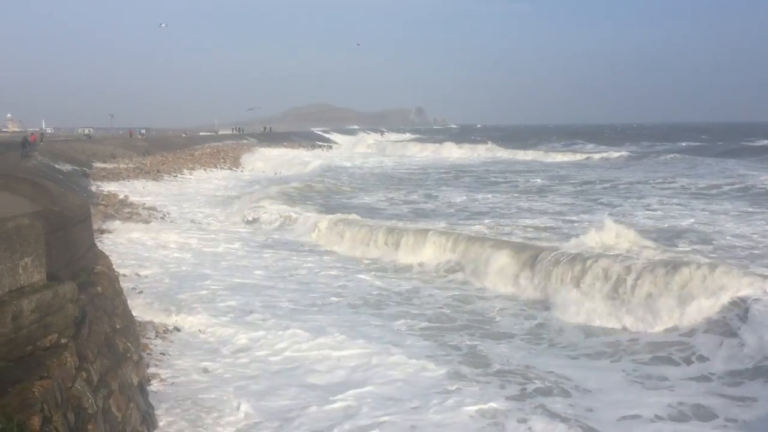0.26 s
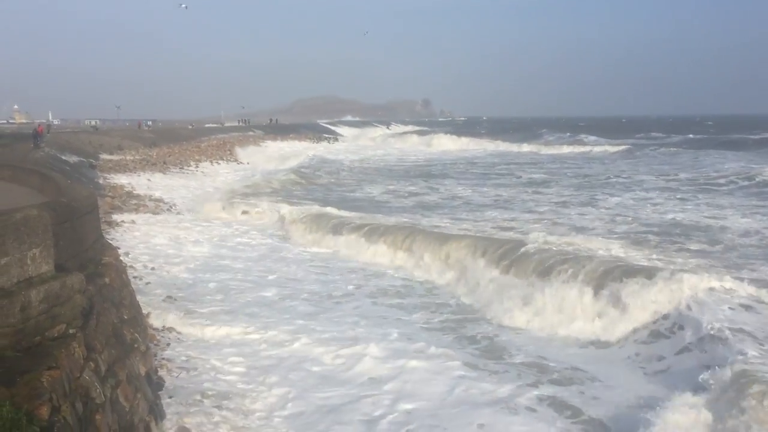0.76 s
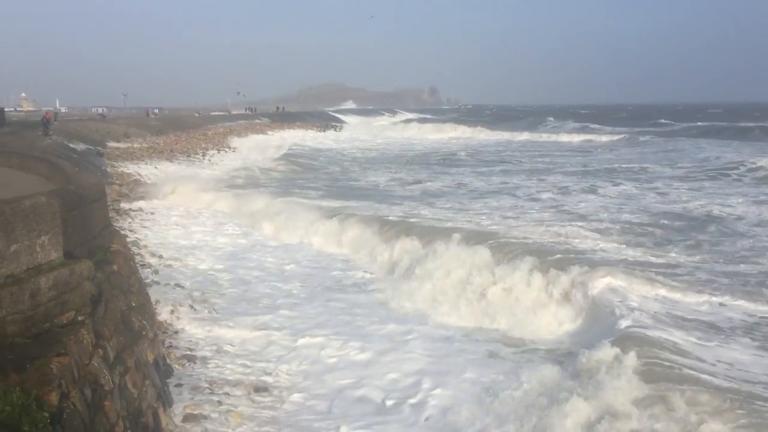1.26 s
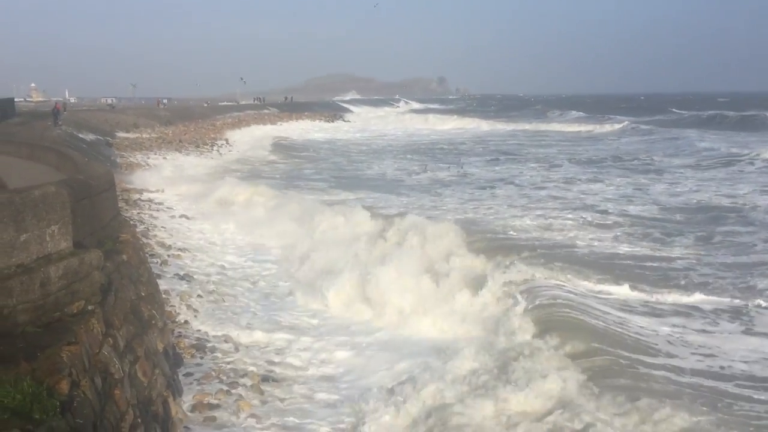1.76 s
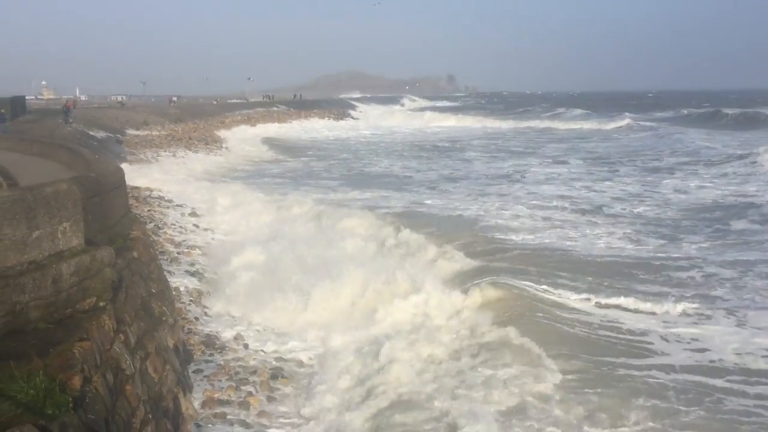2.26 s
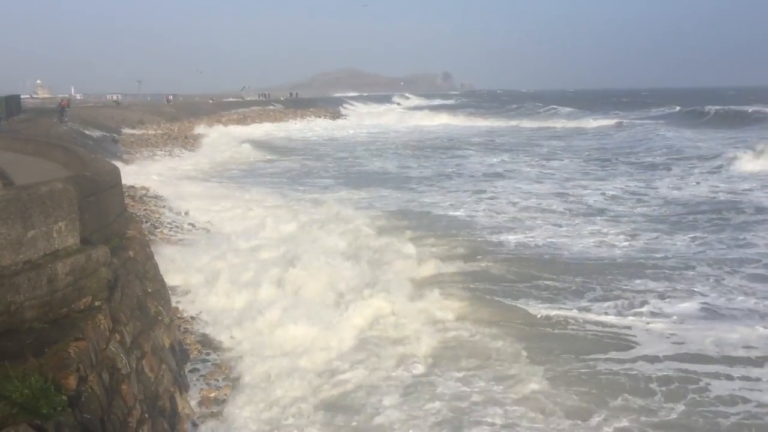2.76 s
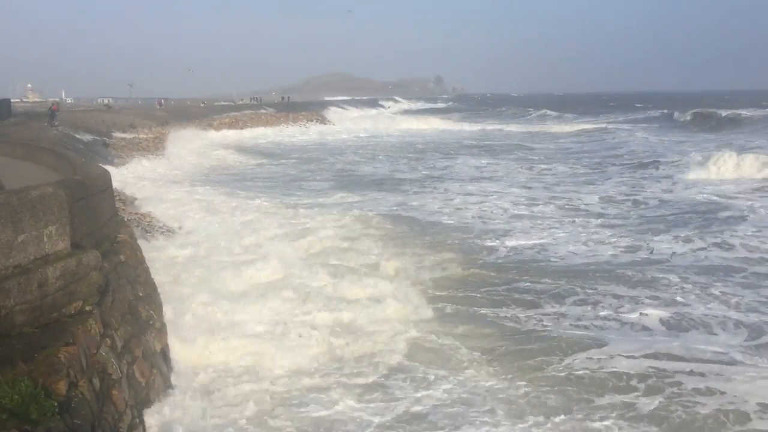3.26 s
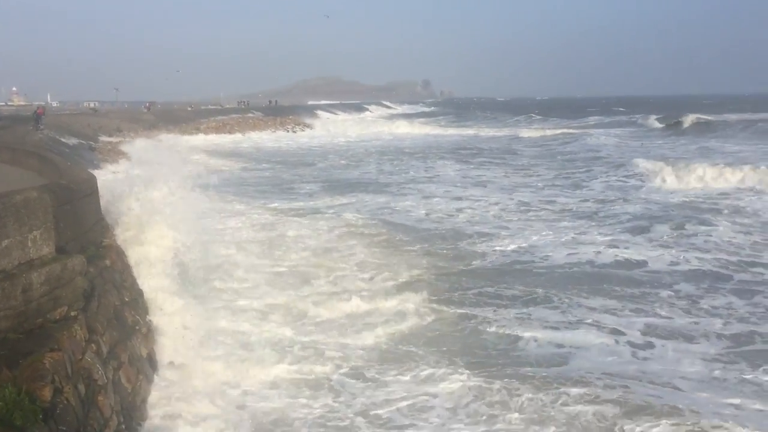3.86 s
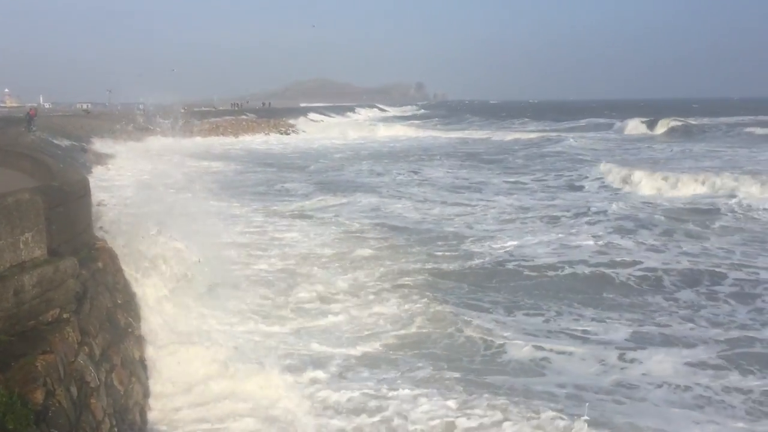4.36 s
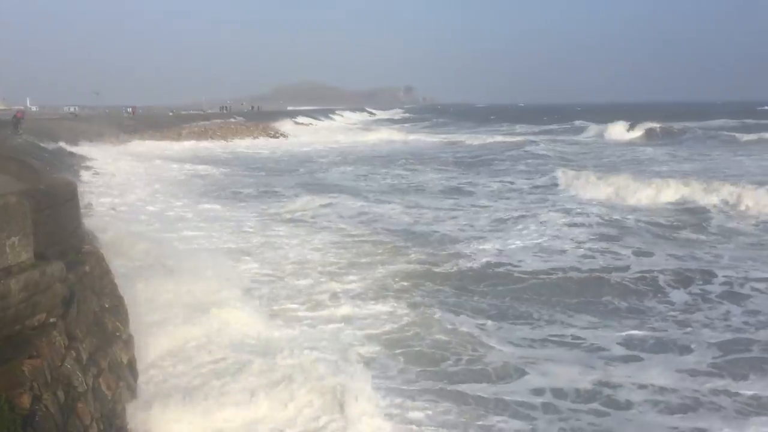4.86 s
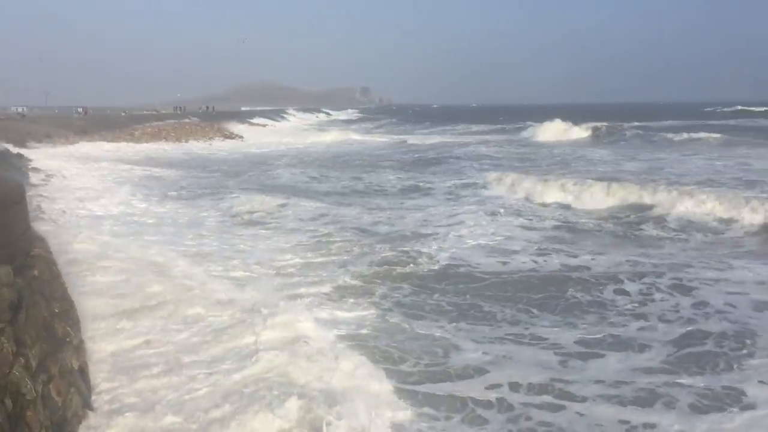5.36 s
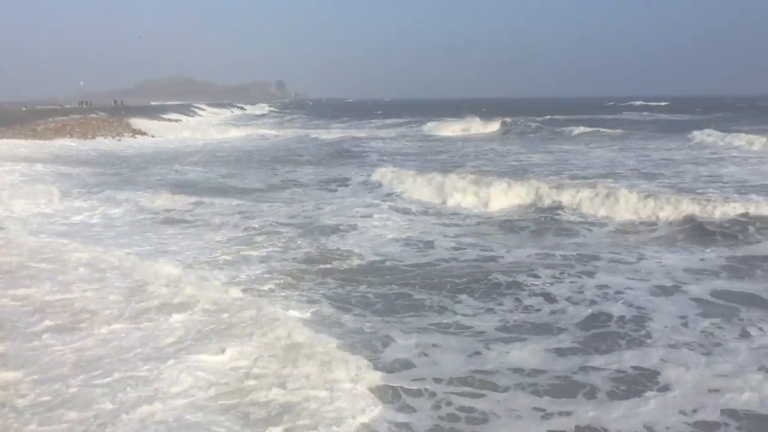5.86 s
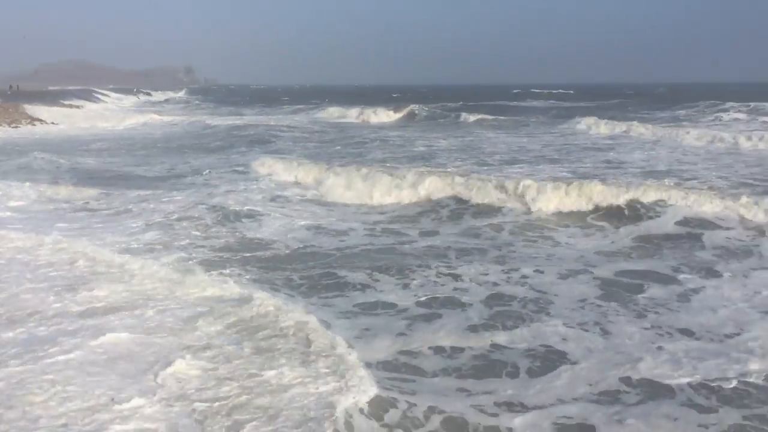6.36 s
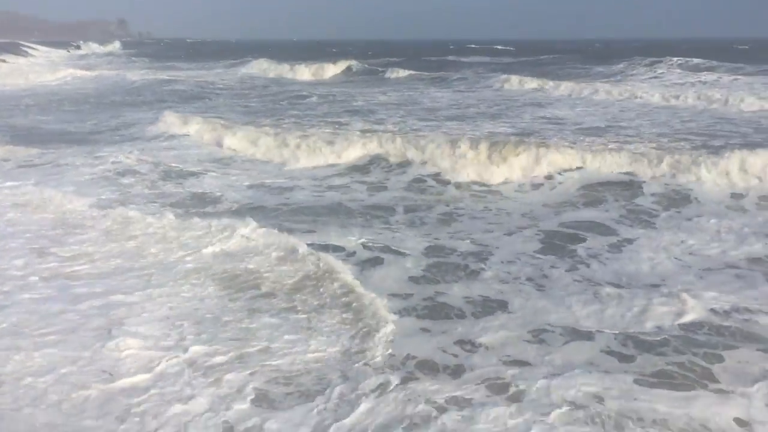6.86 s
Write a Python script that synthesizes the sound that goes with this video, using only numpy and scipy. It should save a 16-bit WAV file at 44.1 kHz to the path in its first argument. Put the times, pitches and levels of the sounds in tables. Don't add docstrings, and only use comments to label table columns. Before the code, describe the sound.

Outdoors at a stormy shore, wind noise dominates: deep irregular thumps near the microphone, soft flutter and short ragged bursts. Heavy surf forms a steady, dull roar underneath, without distinct separate crashes. The wind peaks in the middle with a volley of pops and again shortly after five seconds, settles to rumble and surf, and rises once more at the end. Treble is scarce.

```python
import sys
import numpy as np
from scipy import signal
from scipy.fft import rfft, irfft, next_fast_len
from scipy.io import wavfile
from scipy.ndimage import uniform_filter1d, map_coordinates

SR = 44100
rng = np.random.default_rng(int(sys.argv[2]) if len(sys.argv) > 2 else 0)


def output_pcm(signal):
    pcm = np.clip(np.atleast_2d(signal).T, -1, 1) * 32767
    wavfile.write(sys.argv[1], SR, np.round(pcm).astype(np.int16))


def to_linear_factor(level_db):
    exponent = np.asarray(level_db, float) / 20
    return 10 ** exponent


N = 313242

# [t/s, level/dB]
WIND_STRENGTH = [(0.0, -28), (0.16, -36), (0.57, -28), (1.24, -27), (1.48, -32.5), (1.64, -29.5),
                 (2.18, -33.5), (2.47, -31.5), (2.65, -31.5), (3.48, -33), (4.11, -30.5), (4.25, -25),
                 (4.43, -26.5), (4.59, -25.5), (5.24, -28), (5.63, -32.5), (6.74, -33), (7.1, -25)]
# [f/Hz, level/dB]
FLUTTER_COLOUR = [(50, -32), (110, -1.5), (170, -2), (260, -5), (400, -6.5), (600, -15.5), (1000, -52),
                  (3000, -130)]
# [f/Hz, level/dB]
RASP_COLOUR = [(200, -10), (500, 0.5), (900, 7), (1500, 0), (2250, 1), (2800, -12.5), (3700, -29),
               (4500, -41.5), (5800, -53.5), (7200, -51), (9000, -58.5), (10500, -92)]
# [t/s, peak level/dB]
POP_EVENTS = [(0.9113, -17.5), (0.9753, -14.5), (1.3301, -16.5), (2.147, -14), (2.1746, -17.5),
              (2.2045, -16.5), (2.7652, -18), (2.811, -17), (3.0149, -23), (3.2884, -16.5), (3.5315, -17.5),
              (3.7819, -21.5), (3.9987, -20), (4.0688, -12), (4.088, -17.5), (4.1289, -11.5), (4.1486, -11),
              (4.2169, -19.5), (4.2471, -10.5), (4.2979, -12.5), (4.404, -12.5), (4.6388, -16.5),
              (4.7042, -15.5), (4.8819, -13), (5.0247, -25), (5.095, -14.5), (5.2265, -14), (5.4002, -13),
              (6.9648, -16), (7.0696, -15.5)]


def unit(x):
    return x / np.sqrt(np.mean(x ** 2) + 1e-20)


def curves(rows):
    times, *columns = np.transpose(rows)
    return [np.interp(np.arange(N) / SR, times, column) for column in columns]


def wobble(rate):
    knots = rng.standard_normal(N // 40)
    return map_coordinates(knots, [np.arange(N) * rate / SR])


def coloured(x, spectrum):
    size = next_fast_len(N + 8192)
    hz, db = np.transpose(spectrum)
    log_hz = np.log(np.fft.rfftfreq(size, 1 / SR) + 1)
    gain = to_linear_factor(np.interp(log_hz, np.log(hz), db))
    return unit(irfft(rfft(x, size) * gain, size)[:N])


def steadied(x, seconds):
    envelope = abs(signal.hilbert(x, next_fast_len(N))[:N])
    level = uniform_filter1d(envelope, size=round(seconds * SR))
    return unit(x / (level + 0.3))


def patchy(patchy_db):
    z = signal.stft(rng.standard_normal(N), nperseg=512)[2]
    field = uniform_filter1d(rng.standard_normal(z.shape), size=6, axis=0)
    field = uniform_filter1d(field, size=10, axis=1)
    return signal.istft(z * to_linear_factor(patchy_db * unit(field)), nperseg=512)[1][:N]


def spiky(lump_db, rate):
    return rng.standard_normal(N) * to_linear_factor(lump_db * wobble(rate))


def puffs(rows):
    half = SR // 8
    power = np.zeros(N + SR)
    t = np.arange(-half, half) / SR
    for time, db, length in rows:
        shape = np.exp(-abs(t / (0.6 * length)) ** 3)
        power[round(time * SR):][:len(t)] += to_linear_factor(db) ** 2 * shape
    return np.sqrt(power[half:][:N])


def buffeting():
    # [f/Hz, level/dB]
    thump_colour = [(15, -36.5), (25, -27.5), (38, -10.5), (52, -2), (72, 1.5), (110, -5), (170, -15),
                    (300, -25.5), (600, -60), (2000, -140)]
    # [t/s, peak level/dB, half length/s]
    large_eddies = [(0.217, -16.5, 0.039), (0.43, -22.5, 0.19), (0.873, -17.5, 0.24), (1.192, -17, 0.078),
                    (1.366, -16, 0.092), (1.558, -20.5, .08), (1.908, -17, 0.075), (2.204, -20, .14),
                    (2.573, -20, 0.11), (2.816, -22, .13), (2.97, -21.5, 0.078), (3.185, -19, 0.051),
                    (3.38, -22, .1), (3.537, -19.5, 0.032), (3.83, -18.5, 0.026), (4.003, -16, .04),
                    (4.148, -12, 0.062), (4.25, -18, .12), (4.37, -17, .11), (4.498, -19, 0.07),
                    (4.845, -17, .09), (5.058, -16, 0.046), (5.232, -8, 0.041), (5.413, -19, 0.27),
                    (6.067, -14, 0.017), (6.218, -20.5, 0.087), (6.46, -21, 0.08), (6.668, -21, .09),
                    (7.004, -19, .05), (7.098, -13, .035)]
    rumble_db, rumble_grows = 4, 0.8
    edge_fall_db = 10
    wind_db = curves(WIND_STRENGTH)[0]
    t = np.arange(N) / SR
    level = to_linear_factor(wind_db.mean() + rumble_db + rumble_grows * (wind_db - wind_db.mean()))
    for time, peak_db, half_length in large_eddies:
        thump = to_linear_factor(peak_db - edge_fall_db * abs(t - time) / half_length)
        level = np.maximum(level, thump)
    push = level * steadied(coloured(rng.standard_normal(N), thump_colour), seconds=0.054)
    return push / (1 + (push / 0.5) ** 4) ** 0.25


def eddies():
    # [t/s, body level/dB, rasp level/dB, length/s]
    puff_events = [(0.453, -22, -42, 0.025), (0.536, -25, -38, 0.048), (0.721, -31, -28.5, 0.012),
                   (0.762, -29.5, -30.0, 0.024), (1.209, -28, -33, 0.033), (1.329, -33, -33, 0.052),
                   (1.914, -25.5, -31.5, 0.043), (2.176, -19.5, -38, 0.0091), (2.211, -22.5, -30.5, 0.039),
                   (2.576, -27.5, -35.5, 0.034), (3.53, -25, -32.5, 0.021), (3.789, -24, -29.5, 0.041),
                   (3.909, -25, -28.5, 0.017), (4.07, -21, -37.5, 0.023), (4.129, -27.5, -27, 0.023),
                   (4.203, -31, -25, 0.026), (4.256, -31, -33.5, 0.019), (4.373, -43, -30, 0.015),
                   (4.75, -30, -28.5, 0.015), (5.097, -24, -36, 0.023), (5.148, -26, -30.5, 0.03),
                   (5.217, -29, -30, 0.022), (5.247, -30, -24.5, 0.039), (5.36, -26.5, -23, 0.055),
                   (6.059, -27, -35, 0.037), (6.471, -25, -33, 0.032), (6.521, -28, -36, 0.018),
                   (6.669, -35, -30.5, 0.028), (6.905, -25, -35, 0.034), (7.097, -24, -30.5, 0.029)]
    wake_late_s, wake_length_s = 0.0005, 0.016
    wake_body_db, wake_rasp_db = -16, -17.5
    wakes = [(time + wake_late_s, db + wake_body_db, db + wake_rasp_db, wake_length_s)
             for time, db in POP_EVENTS]
    times, body_db, rasp_db, length = np.transpose([*puff_events, *wakes])
    lumps = spiky(lump_db=4.5, rate=300)
    body = steadied(coloured(lumps, FLUTTER_COLOUR), seconds=0.038)
    rasp = steadied(coloured(lumps, RASP_COLOUR), seconds=0.023)
    body_swell = puffs(zip(times, body_db - 0.4, length))
    rasp_swell = puffs(zip(times, rasp_db + 0.46, length))
    return body_swell * body + rasp_swell * rasp


def pops():
    # [f/Hz, level/dB]
    jolt_colour = [(80, -38.5), (250, -4), (600, 5.5), (1500, -4), (2300, -9), (2900, -25), (3800, -35.5),
                   (4800, -58.5), (7000, -88)]
    times, db = np.transpose(POP_EVENTS)
    chance = rng.uniform(-1, 1, (len(times), 2))
    strength = to_linear_factor(db) * np.sign(chance[:, 0])
    rebound_times = times + 0.0016 + 0.0008 * chance[:, 1]
    kicks = np.zeros(N)
    kicks[np.round(times * SR).astype(int)] = strength
    kicks[np.round(rebound_times * SR).astype(int)] = -0.55 * strength
    jolts = coloured(kicks, jolt_colour)
    return to_linear_factor(2.5) * jolts * np.max(abs(kicks)) / np.max(abs(jolts))


def cracks():
    # [t/s, peak level/dB, f/Hz, length/s]
    snaps = [(4.128, -57, 4700, 0.0016), (4.1502, -57, 7250, .002), (4.205, -53.5, 8050, 0.0022),
             (4.25, -56, 4500, 0.0016), (4.212, -65, 7000, .008), (5.223, -58, 7450, 0.0016),
             (5.227, -62, 6540, 0.005), (5.25, -50, 4500, 0.0016), (5.256, -62, 6600, 0.0062),
             (5.338, -61, 6850, .002), (5.3507, -47.5, 7150, 0.0036), (5.364, -65, 6050, 0.0017),
             (5.378, -66.5, 7550, 0.0061)]
    ticks, slaps = np.zeros(N + SR), np.zeros(N + SR)
    t = np.arange(-400, 400) / SR
    for time, db, hz, length in snaps:
        noise = rng.standard_normal((2, len(t)))
        bell = to_linear_factor(db) * np.exp(-(t / length) ** 2)
        wander = np.cumsum(0.45 * noise[0])
        start = round((time + t[0]) * SR)
        ticks[start:][:len(t)] += bell * np.sin(2 * np.pi * hz * t + wander)
        slaps[start:][:len(t)] += bell * noise[1]
    band = signal.butter(3, [3500, 9800], "band", fs=SR, output="sos")
    bright = signal.sosfiltfilt(band, ticks[:N])
    return bright + to_linear_factor(30.0) * np.std(slaps[:N]) * coloured(slaps[:N], RASP_COLOUR)


def surf():
    # [t/s, level/dB]
    sea_strength = [(0.0, -29), (0.41, -27), (1.24, -27.5), (2.21, -30.5), (2.47, -30.5), (3.48, -31.5),
                    (4.11, -30), (4.25, -26.5), (4.43, -28.5), (5.24, -29.5), (5.42, -31), (6.74, -29),
                    (7.1, -26.5)]
    # [f/Hz, level/dB]
    roar_colour = [(150, -33.5), (300, -6.5), (480, -9.5), (640, -0.5), (800, -5), (1100, -7), (1800, -15),
                   (2270, -12.5), (2750, -25.5), (3300, -30), (3800, -38), (4400, -52.5), (5200, -62.5),
                   (7000, -100)]
    flutter_db, roar_db = curves(WIND_STRENGTH)[0], curves(sea_strength)[0]
    shared = wobble(18)
    flutter_level = to_linear_factor(flutter_db + 0.25 * shared + 1.3 * wobble(9))
    flutter = flutter_level * coloured(patchy(patchy_db=0.0), FLUTTER_COLOUR)
    splashes = to_linear_factor(0.99 * wobble(120))
    roar = coloured(splashes * patchy(patchy_db=0.44), roar_colour)
    return flutter + to_linear_factor(roar_db + 0.72 * shared) * roar


def foam():
    # [t/s, level/dB]
    spray_strength = [(0.0, -69.5), (0.35, -65.5), (0.7, -69), (0.85, -68.5), (0.93, -65), (1.3, -65.5),
                      (1.7, -70.5), (1.97, -64.5), (2.25, -72), (3.4, -76), (4.75, -75.5), (5.16, -73),
                      (5.44, -76.5), (6.3, -74), (7.1, -73)]
    # [f/Hz, level/dB]
    foam_colour = [(3500, -36.5), (4600, -8.5), (5700, -5.5), (7050, 3.5), (7700, -2), (8600, -5.5),
                   (9700, -14.5), (10500, -28), (12000, -63.5)]
    fizz = spiky(lump_db=1.5, rate=300) + patchy(patchy_db=2)
    level = to_linear_factor(curves(spray_strength)[0] + 0.87 * wobble(9))
    return level * coloured(fizz, foam_colour)


def scene():
    wind = buffeting() + eddies() + pops() + cracks()
    sea = surf() + foam()
    return (wind + sea)[None]


def band_limit(x):
    return signal.sosfilt(signal.butter(12, 15750, fs=SR, output="sos"), x)


def record(dry):
    # [f/Hz, level/dB]
    hiss_colour = [(4000, -5.5), (9500, -5.5), (10500, -2.5), (11200, 0), (15700, -5)]
    bass_cut = signal.butter(2, 28, "high", fs=SR, output="sos")
    hiss = coloured(rng.standard_normal(N), [(100, -59.5), *hiss_colour])
    mix = signal.sosfilt(bass_cut, dry) + to_linear_factor(-85.0) * hiss
    return band_limit(mix)


dry = scene()
out = record(dry)
output_pcm(out)
```